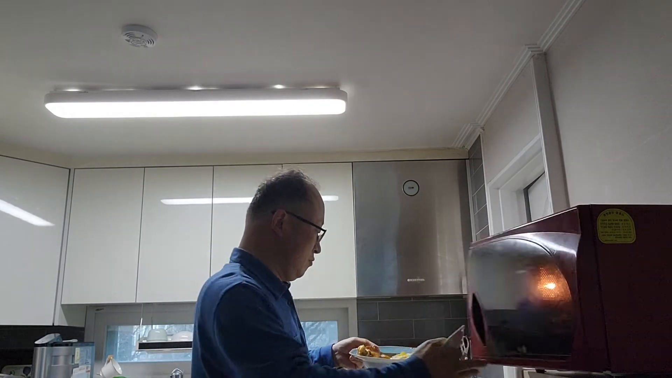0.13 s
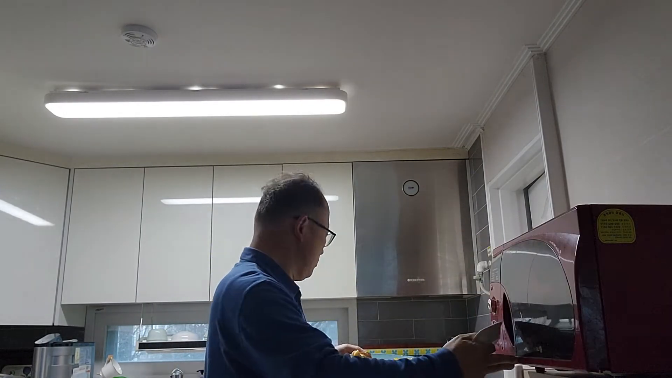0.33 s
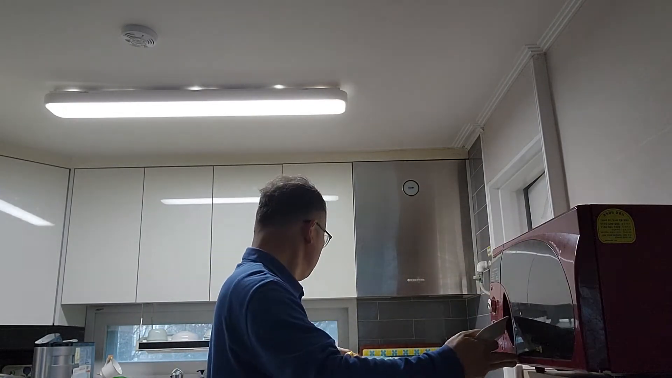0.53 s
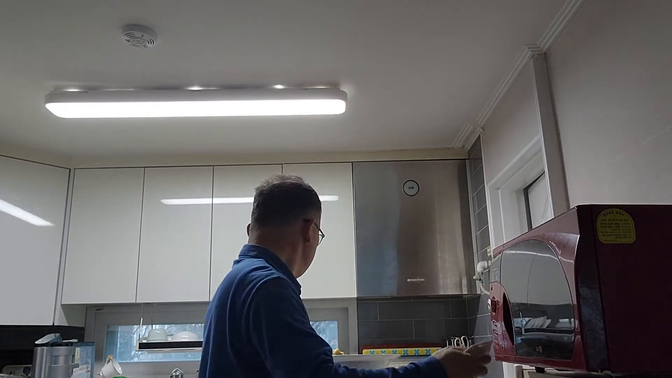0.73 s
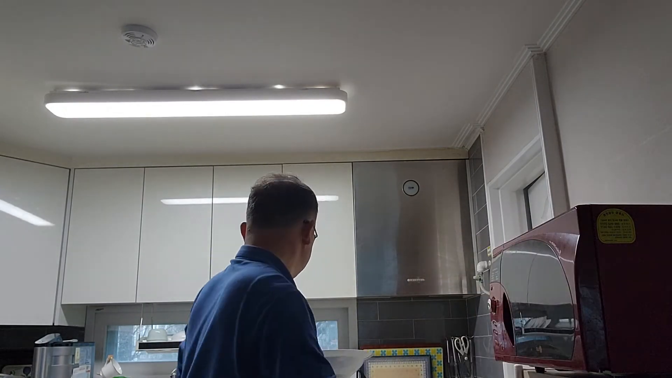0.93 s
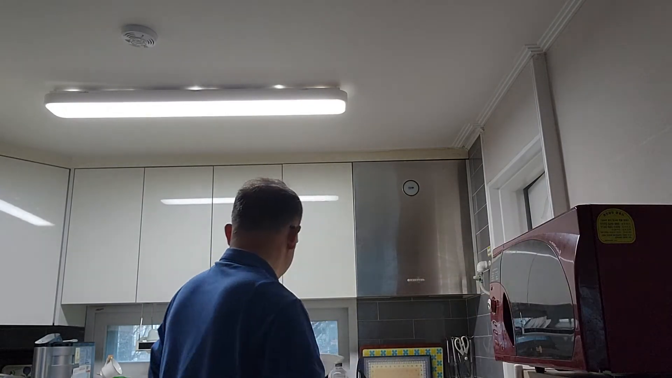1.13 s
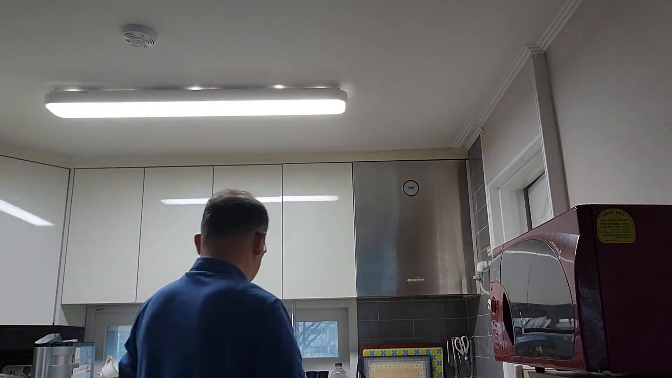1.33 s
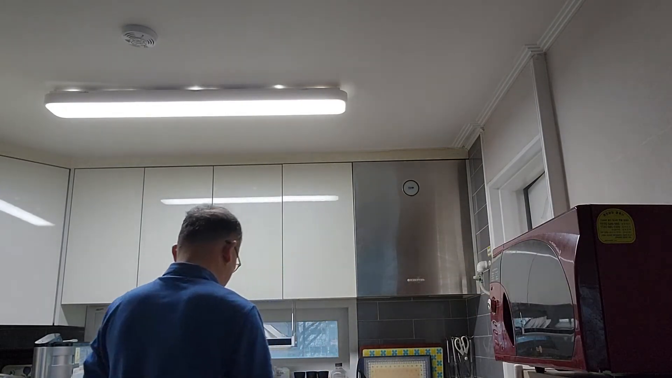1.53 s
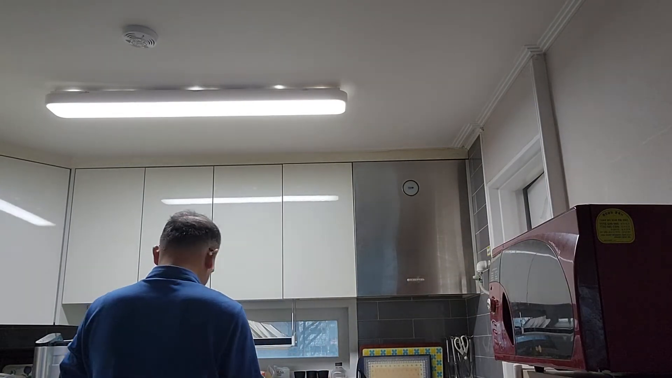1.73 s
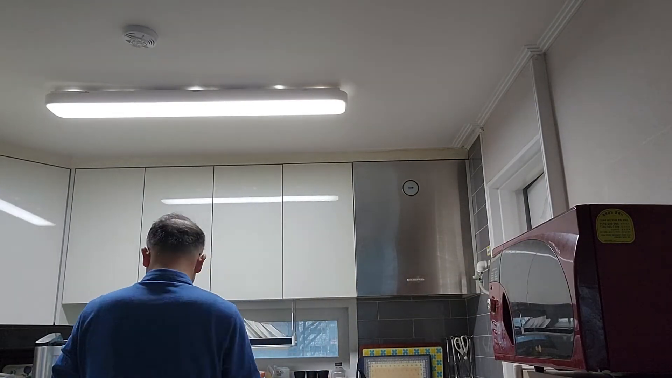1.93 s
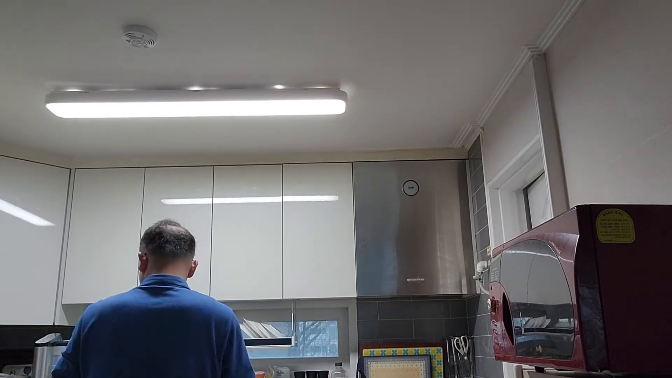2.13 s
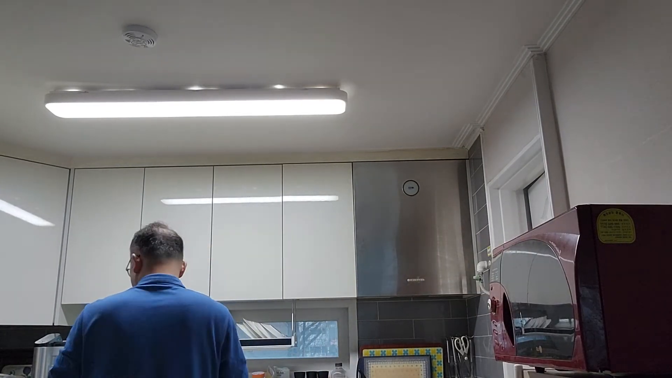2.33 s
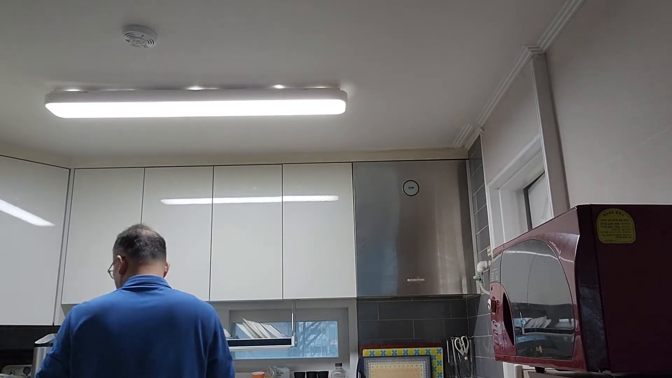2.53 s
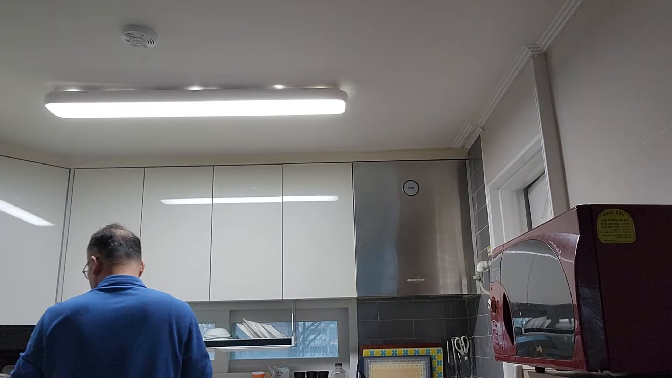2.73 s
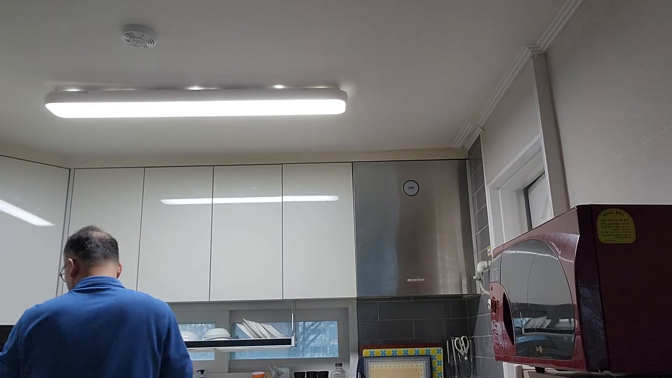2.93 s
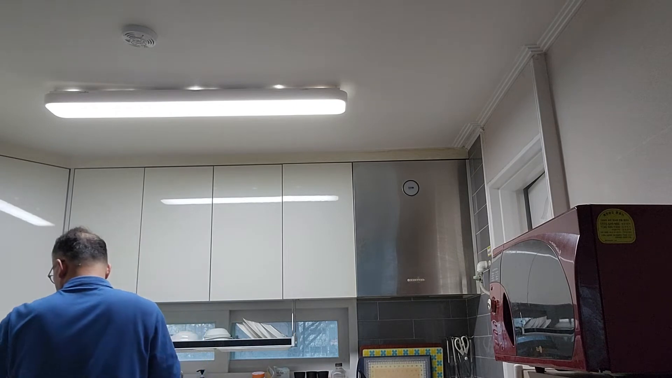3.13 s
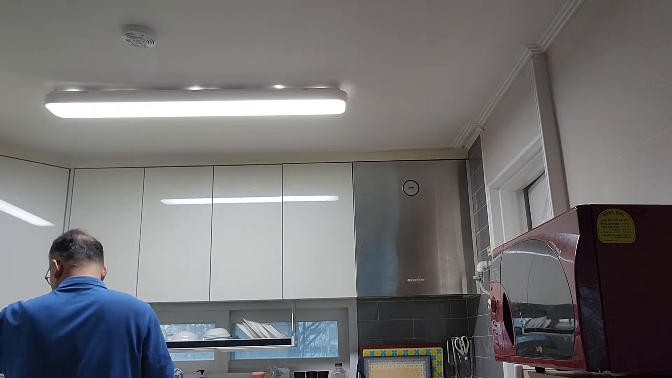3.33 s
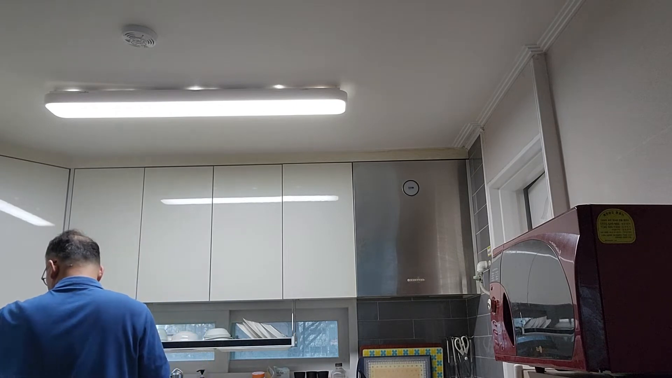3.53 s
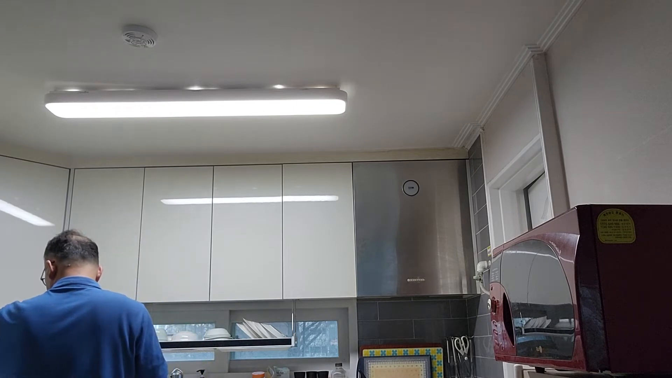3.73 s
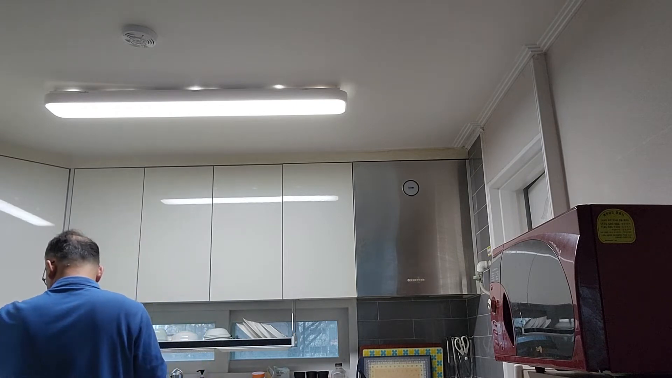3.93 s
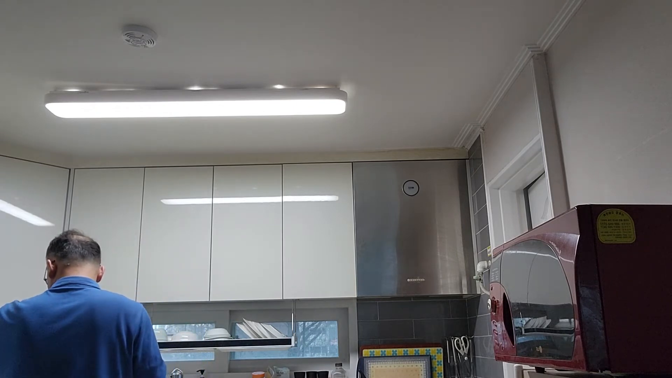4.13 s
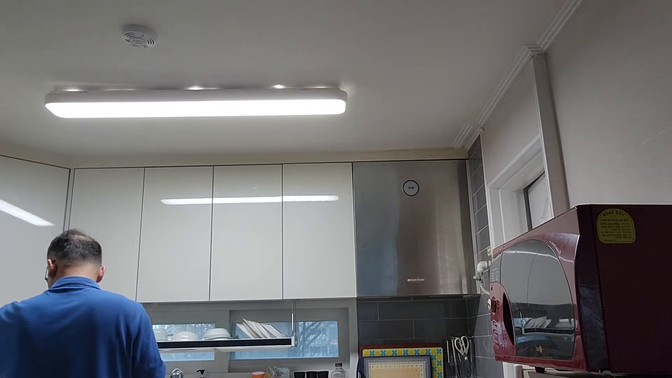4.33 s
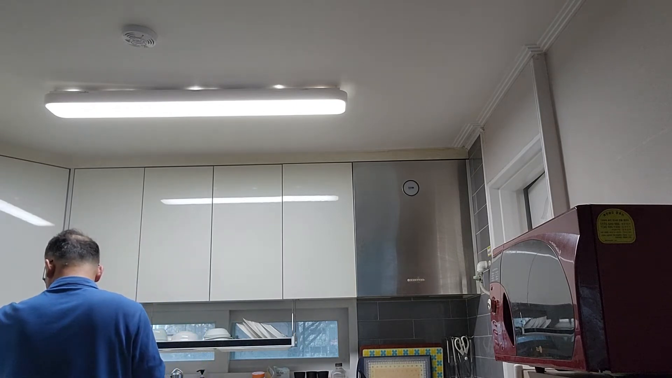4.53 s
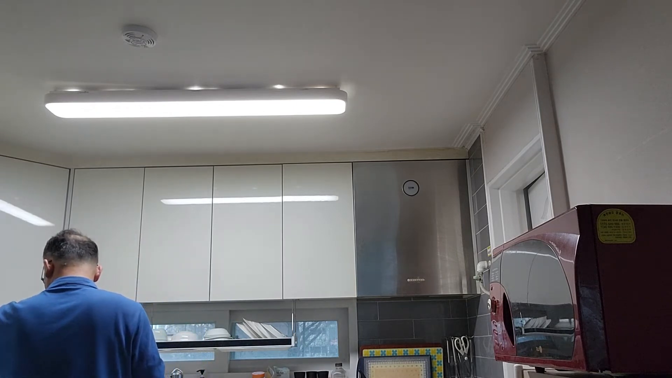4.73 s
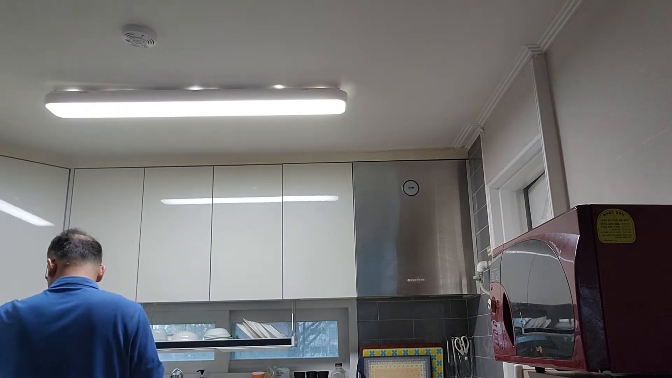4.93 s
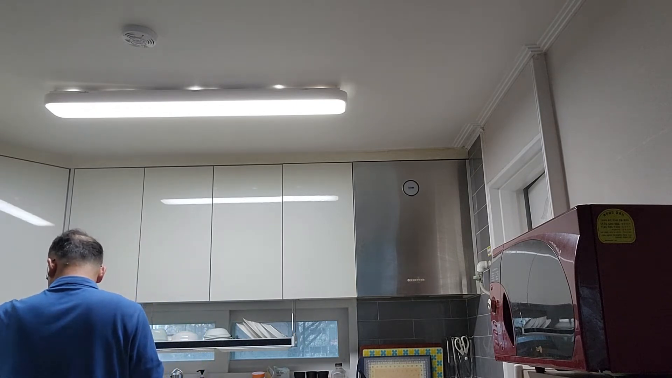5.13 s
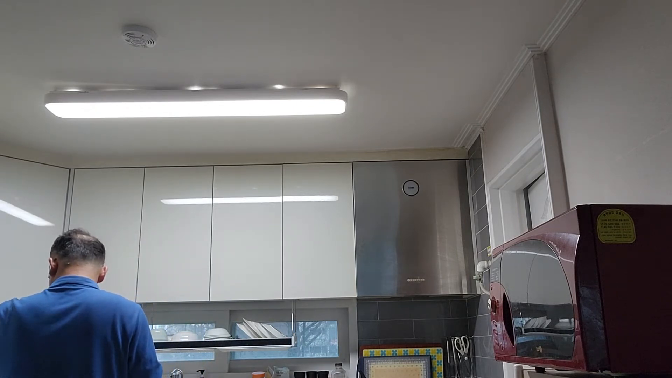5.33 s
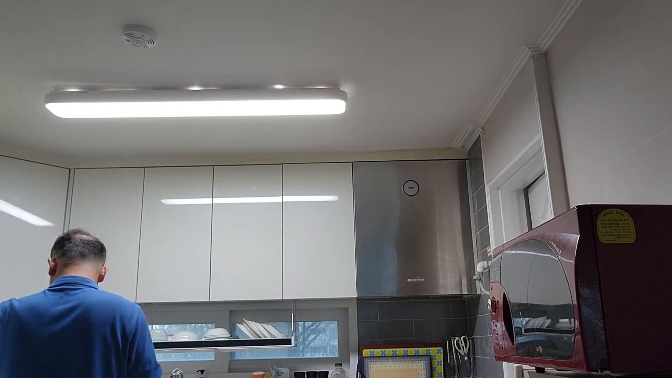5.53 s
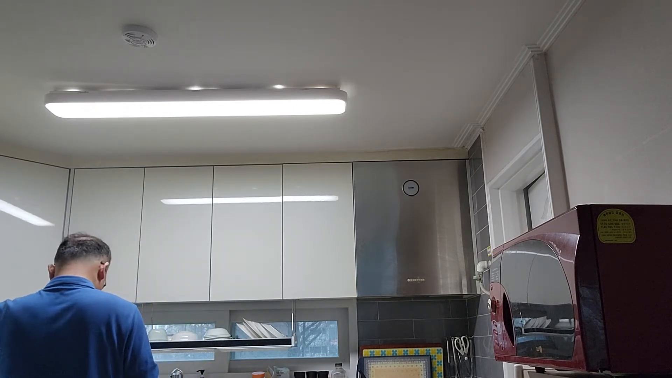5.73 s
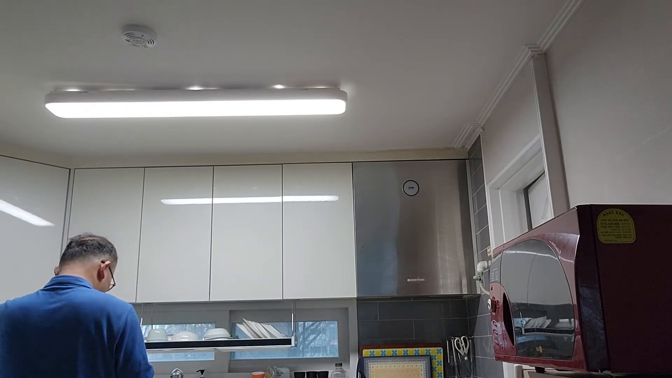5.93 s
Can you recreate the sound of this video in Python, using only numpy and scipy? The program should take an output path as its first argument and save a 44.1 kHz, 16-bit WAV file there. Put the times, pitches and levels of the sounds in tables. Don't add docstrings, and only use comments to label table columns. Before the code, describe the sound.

In a hard-walled kitchen, an oven door thumps closed, a bowl lands with rattling clinks, a softer clink follows, then crisp plastic wrap crackles.

```python
import sys
import numpy as np
from scipy import signal
from scipy.fft import rfft, irfft, next_fast_len
from scipy.io import wavfile

SR = 44100
rng = np.random.default_rng(int(sys.argv[2]) if len(sys.argv) > 2 else 0)


def persist_wave(psi):
    counts = np.round(np.clip(psi, -1, 1) * 32767).astype(np.int16)
    wavfile.write(sys.argv[1], SR, np.atleast_2d(counts).T)


def decibels_to_gain(level_db):
    exponent = np.asarray(level_db, float) / 20
    return 10 ** exponent


N = 268172

# freq_hz, level_db
HUM_SPECTRUM = [(12, -29.5), (20, 12.5), (70, -1.5), (172, -14), (310, -15), (459, -19.5), (527, -23.5),
                (624, -21), (1660, -35), (2750, -40), (3530, -42), (7310, -47), (8890, -56), (14700, -54),
                (16000, -58)]
# freq_hz, likeness (0 to 1)
LIKENESS = [(30, 1), (70, 0.952), (150, 0.87), (300, 0.77), (600, 0.037), (1500, 0.011), (16000, 0.016)]
# freq_hz, t60_s
ROOM_T60 = [(60, 0.93), (250, 0.88), (700, .36), (2000, 0.33), (6000, 0.25), (15000, 0.11)]
# start_s, level_db, length_s
LEANS = [
    (4.031, -52.5, 0.157),
    (4.246, -52, 0.057),
    (4.409, -48.5, 0.035),
    (4.783, -47.5, 0.098),
    (4.853, -39, 0.032),
    (5.047, -44, 0.023),
    (5.205, -38.5, 0.098),
    (5.337, -38.5, 0.021),
    (5.518, -45.5, 0.095),
    (5.983, -57, 0.16),
]
# start_s, peak_db, length_s, brightness_db
MOVES = [(0.047, -83, 0.029, -2), (0.345, -48.5, 0.0208, -5.5), (0.596, -67, 0.29, -4),
         (0.688, -71, 0.0414, -9.5), (0.774, -62.5, 0.0272, -2), (0.833, -72.5, 0.019, 0.5),
         (0.981, -73.5, 0.225, -3), (1.024, -68, 0.0303, -2.78), (1.062, -64, 0.032, -0.5),
         (1.138, -71, 0.0286, 2.5), (1.45, -74, 0.0557, 1.5), (1.664, -66.5, 0.0283, 8),
         (1.769, -63, 0.0495, -5), (1.975, -60.5, 0.0279, 9.5), (2.055, -74, 0.027, -5),
         (2.161, -64.5, 0.0268, 1), (2.237, -47, 0.0097, -6.5), (2.359, -63.5, 0.0436, 0.5)]
# start_s, peak_db, pitch_hz, t60_s
KNOCKS = [(0.79, -68.5, 3800, 0.0561), (0.8, -61, 3780, 0.0313), (1.125, -73.5, 3490, 0.054),
          (1.065, -64, 5040, 0.035), (1.8, -67.5, 3800, 0.0558), (2.244, -46, 900, .008),
          (2.246, -53, 2190, .01), (4.169, -43, 3430, 0.0293), (4.18, -49.5, 630, 0.073),
          (4.283, -63.5, 402, 0.048), (4.55, -60, 2230, .06), (4.285, -56, 1700, .05),
          (5.725, -63.5, 3456, 0.04)]
# start_s, peak_db, pitch_hz, length_s
SLIDES = [
    (5.444, -43.5, 724.8, 0.0321),
    (5.448, -50, 482.9, 0.0467),
    (5.656, -58, 1103, 0.0335),
    (5.709, -58.5, 1050, 0.0374),
]
# start_s, peak_db, length_s, dish_grip_db
TUGS = [(3.733, -50.5, 0.0165, -3.5), (3.782, -70, 0.0517, 3.5), (3.91, -56.5, 0.0356, -0.05),
        (3.923, -48.5, 0.0503, -1.45), (4.079, -54.5, 0.0447, 1), (4.153, -37.5, 0.0416, -2.5),
        (4.255, -43, 0.027, -3), (4.471, -51.5, 0.023, -2.5), (4.529, -49.5, 0.029, 3.5),
        (4.628, -61, 0.047, 7.5), (4.765, -45.5, 0.038, -5.5), (4.795, -38.5, 0.03, -7),
        (4.828, -33, 0.0674, -2.5), (4.942, -50.5, 0.056, -3.5), (5.018, -32, 0.032, -6),
        (5.078, -40, 0.07, -3.5), (5.137, -34.5, 0.0481, -4.5), (5.189, -32, .03, -7),
        (5.203, -29.5, 0.035, -6.5), (5.244, -30.5, .025, -5.5), (5.273, -29.5, 0.036, -5),
        (5.325, -33, .06, -5), (5.41, -46.5, 0.1014, 5.5), (5.516, -36.5, 0.0543, -5.5),
        (5.594, -44, 0.0228, 5), (5.635, -54, 0.0244, -1), (5.697, -40.5, 0.02234, -2.5),
        (5.769, -60.5, 0.0417, 3.5), (5.996, -69, 0.021, 7.5)]
# freq_hz, width_hz, level_db
FILM_PEAKS = [(1869, 510, -9), (3004, 220, -9), (3400, 200, -9), (5170, 250, -8), (5650, 350, -8),
              (7428, 600, -8)]
# freq_hz, width_hz, level_db
SIZZLE_PEAKS = [(10480, 600, -3.5), (11390, 500, -2), (13560, 1400, -1.5)]
# freq_hz, width_hz, level_db
DISH_PEAKS = [(279.4, 64, -10.5), (430.1, 30, 2.5), (494.4, 30, 2.5), (675.4, 190, -3.5), (1050, 25, .5)]
# start_s, peak_db, hardness_db_per_octave
SET_DOWN = [(2.561, -35, 3.5), (2.567, -19, 0.5), (2.5695, -7.5, -2.5), (2.576, -13.5, 0),
            (2.583, -11.5, 4), (2.590, -17, 1.5), (2.596, -13, 1.73), (2.601, -14.5, -0.8),
            (2.607, -15, -1), (2.613, -9, 4.5), (2.622, -12, -2.34), (2.631, -16, -1.86),
            (2.641, -19.5, -3.5), (2.651, -18, -3)]
# start_s, peak_db, hardness_db_per_octave
NUDGE = [(3.049, -48, 4), (3.054, -33, 3.5), (3.059, -20.5, 4.5), (3.064, -21.5, 4.5),
         (3.068, -17.5, -1.95), (3.072, -19, -7.0), (3.079, -23.5, -1), (3.087, -26.5, -6),
         (3.093, -23.5, -2.55), (3.102, -25.5, -0.56), (3.110, -28, -1.57), (3.119, -26, -1.54),
         (3.128, -34, 0.6)]
# freq_hz, level_db, t60_s
BOWL = [(828, -20, 0.0654), (958, -20, 0.027), (1086, -18.5, 0.11), (1262, -12.5, 0.0261),
        (1341.5, -9.5, 0.0658), (1506, -19, 0.2083), (1839, -18, 0.0816), (1962.2, 2.5, .09),
        (2088, -10, 0.0023), (2170, -14, 0.0444), (2308, -19, 0.0674), (2420.5, -17, 0.059),
        (2580, -14, 0.049), (3429.7, -3.5, 0.0567), (3510, -7.5, .08), (3608, -11, .04)]
# freq_hz, width_hz, level_db
BOWL_TOP = [(4590, 87, -4), (4870, 31, 0), (5100, 60, -2), (5520, 70, -1), (6210, 89, -7), (6630, 44, -8),
            (7250, 40, -13), (8320, 280, -6), (9110, 29, -15), (9450, 61, -3), (10400, 52, -13),
            (11500, 100, -10), (12000, 31, -16), (12400, 28, -24), (13100, 68, -11), (14200, 62, -15),
            (15400, 100, -15)]
# freq_hz, level_db, t60_s
PLATE = [(485, -20, 0.036), (591, -20, 0.046), (752, -12, 0.083), (1175.3, 1.5, .08), (1332, -12.5, 0.057),
         (1639, -15.5, 0.056), (1952.5, -1.5, 0.0445), (2018, -8, 0.046), (2066, -1, .05),
         (2132, -8.5, .05), (2300, -14.5, .05), (2672.7, -4, .12), (2845, -8, 0.056), (3392, -14, .04),
         (3494, -13, .035), (3695, -14, 0.044)]
# freq_hz, width_hz, level_db
PLATE_TOP = [(4130, 59, -5), (4470, 34, -3), (5170, 35, 0), (5580, 46, -5), (6220, 40, -7), (6620, 38, -5),
             (7560, 36, -18), (8150, 33, -14), (9390, 33, -18), (10200, 37, -17), (10900, 35, -24),
             (11500, 44, -19), (12100, 120, -20), (12800, 34, -26), (13500, 42, -23), (14100, 150, -30),
             (14900, 35, -32)]
# freq_hz, level_db_per_hz
GRIT = [(180, -66), (300, -38), (1150, -5.5), (1750, -16.5), (1964, -2.5), (2980, -22), (3520, -3),
        (4020, -24), (6500, -27), (8000, -40), (16000, -52)]
# freq_hz, level_db, t60_s
BOOM = [(99.5, -2.5, .1), (197.4, -14.5, 0.055), (72, -12.5, .16), (147.4, -22, .45), (113.5, -16, .27),
        (159.7, -23, 1.1), (210.8, -25, .25), (280.63, -24, .4), (99.5, -27.5, .69), (229.7, -29, .4),
        (305, -28.5, 0.35), (261, -27, 0.3), (375.4, -20.5, 0.27)]
# freq_hz, level_db, t60_s
REBOUND = [(143, -12.5, 0.28), (216.4, -30, .25), (149.86, -19, .75), (279.4, -27, .35), (112, -21, .3)]
# start_s, peak_db, crack_t60_s
DOOR = [(0.3646, -11, 0.0084), (.370, -21, 0.0089), (.375, -17.5, 0.033), (.388, -24.5, 0.12),
        (0.401, -21.5, 0.019), (.408, -5, 0.014), (.412, -11, 0.013), (0.418, -11.5, 0.016),
        (.427, -15.5, 0.016), (.436, -20, 0.036), (.452, -24, 0.11)]
# freq_hz, level_db, t60_s
CASE = [(405, -20.5, 0.3), (409, -4, 0.083), (517, -23, 0.2), (608, -24, 0.16), (668, -13, 0.2),
        (721, -15, 0.25), (1034, -24, 0.19), (549, -22, .15)]
# freq_hz, level_db, t60_s
LATCH = [(668, -1, .04), (735, -2.5, 0.04), (145, -11, 0.05), (404, -16, 0.025), (1457, -17, 0.034),
         (2117, -7.5, 0.019), (3500, -20, 0.025), (8070, -21, 0.013)]
# freq_hz, level_db_per_hz
CRACK = [(190, -31.5), (330, -10), (700, -5), (900, -13), (1450, -11), (2140, -17), (3800, -20),
         (6000, -26.5), (8200, -29), (16000, -32.5)]


def rms_one(x):
    return x / np.sqrt(np.mean(x ** 2) + 1e-20)


def at_hz(points, hz):
    table_hz, value = np.array(points).T
    return np.interp(np.log(hz), np.log(table_hz), value)


def filtered(x, order, edge_hz, kind="low"):
    return signal.sosfilt(signal.butter(order, edge_hz, kind, fs=SR, output="sos"), x)


def pair(n):
    hz = np.maximum(np.arange(n // 2 + 1) * SR / n, 1)
    mid, side = rfft(rng.standard_normal((2, n)))
    alike = np.clip(at_hz(LIKENESS, hz), 0, 1)
    return np.sqrt(1 + alike) * mid + np.sqrt(1 - alike) * side * [[1], [-1]], hz


def coloured(spectrum):
    n = next_fast_len(N)
    both, hz = pair(n)
    return rms_one(irfft(both * decibels_to_gain(at_hz(spectrum, hz)), n)[:, :N])


def ring(clicks, hz, t60_s):
    r = decibels_to_gain(-60 / (t60_s * SR))
    w = 2 * np.pi * hz / SR
    return signal.lfilter([0, np.sin(w)], [1, -2 * r * np.cos(w), r * r], clicks + 1e-18)


def strike(start_s, level_db, modes, spread_db, hard_db=0., pivot_hz=2000):
    at = np.round(np.array(start_s) * SR).astype(int)
    first, out = at.min(), np.zeros(N)
    luck = rng.standard_normal((len(at), len(modes)))
    for k, (hz, db, t60_s) in enumerate(modes):
        clicks = np.zeros(int(1.5 * SR))
        tilt_db = hard_db * np.log2(hz / pivot_hz)
        clicks[at - first] = decibels_to_gain(level_db + db + spread_db * luck[:, k] + tilt_db)
        out[first:first + len(clicks)] += ring(clicks, hz, t60_s) * (-1) ** k
    return out


def burst(start_s, level_db, rise_s, hold_s, t60_s):
    out = np.zeros(N)
    for s, db, rise, hold, t60 in np.broadcast(start_s, level_db, rise_s, hold_s, t60_s):
        i = int(s * SR)
        t = np.arange(min(N - i, SR // 2)) / SR
        fall_db = 60 * np.maximum(t - hold, 0) / t60
        out[i:][:len(t)] += decibels_to_gain(db - fall_db) * (1 - np.exp(-t / rise)) ** 2
    return out


def wander(step):
    knots = N // step + 2
    return np.interp(np.arange(N) / step, np.arange(knots), rng.standard_normal(knots))


def crackle(peaks, low_hz, high_hz, per_s, uneven_db, broad, shift_db=3.5):
    snaps = (rng.random(N) < per_s / SR) * rng.choice([-1, 1], N)
    snaps = snaps * decibels_to_gain(uneven_db * np.minimum(rng.exponential(1, N), 4))
    snaps = snaps * decibels_to_gain(2 * wander(300))
    out = broad * snaps
    for hz, width_hz, db in peaks:
        r = np.exp(-np.pi * width_hz / SR)
        poles = [1, -2 * r * np.cos(2 * np.pi * hz / SR), r * r]
        peak = signal.lfilter([(1 - r * r) / 2, 0, (r * r - 1) / 2], poles, snaps)
        out = out + decibels_to_gain(db + shift_db * wander(1500)) * peak
    return rms_one(filtered(out, 2, [low_hz, min(high_hz, .45 * SR)], "band"))


def place(x, pan_db, lag):
    i = np.arange(N)
    left = np.interp(i - lag / 2, i, x) * decibels_to_gain(pan_db / 2)
    right = np.interp(i + lag / 2, i, x) * decibels_to_gain(-pan_db / 2)
    return np.array([left, right])


def room_hum():
    return decibels_to_gain(-53.5) * coloured(HUM_SPECTRUM)


def kitchen(x):
    n = 1 << 15
    both, hz = pair(n)
    t, tail = np.arange(n) / SR, 0
    cupboards = decibels_to_gain(10.0 - 60 * t / 0.081)
    next_room = decibels_to_gain(-19.5 - 60 * t / 0.64)
    for centre_hz in 40 * 2 ** np.arange(0, 9, .5):
        band = np.maximum(1 - 2 * np.abs(np.log2(hz / centre_hz)), 0)
        decay = decibels_to_gain(-60 * t / at_hz(ROOM_T60, centre_hz))
        tail = tail + irfft(both * band, n) * (decay + cupboards + next_room)
    tail = tail * (1 - np.exp(-(t / .002) ** 2))
    return signal.fftconvolve(x[None], tail / np.sqrt(np.sum(tail ** 2)), axes=1)[:, :N]


def counter_shake():
    s, db, length_s = np.transpose(LEANS)
    lumps = coloured([(15, -29), (32, 1.0), (50, 10.5), (75, 1.5), (110, -6.5), (170, -20.5), (400, -58.5)])
    return burst(s, db, 0.013, length_s, .25) * lumps


def moves():
    s, peak_db, length_s, bright_db = np.transpose(MOVES)
    rise_s, t60_s, uneven_db = length_s / 5, .1, 2.5
    brush = crackle([(3800, 59, 0.1)], 1800, 7700, 22000, uneven_db, broad=1.0)
    hiss = crackle(SIZZLE_PEAKS, 8800, 17000, 12000, uneven_db, broad=0.79)
    scuff = crackle([(953, 67, 0.11)], 490, 2378, 3700, uneven_db, broad=1.0)
    out = burst(s, peak_db - 17.5, rise_s, length_s, t60_s) * brush
    out += burst(s, peak_db + bright_db - 24.5, rise_s, length_s, t60_s) * hiss
    return out + burst(s, peak_db - bright_db - 15, rise_s, length_s, t60_s) * scuff


def knocks():
    out = np.zeros(N)
    for s, db, hz, t60_s in KNOCKS:
        touch = np.zeros(N)
        touch[round(s * SR):][:4] = decibels_to_gain(db) / 4
        out += ring(touch, hz, t60_s)
    return out


def slides():
    out = np.zeros(N)
    for s, db, hz, length_s in SLIDES:
        t = np.arange(int(length_s * SR)) / SR
        swell = np.sin(np.pi * t / length_s) ** 2
        out[int(s * SR):][:len(t)] += decibels_to_gain(db) * swell * np.sin(2 * np.pi * hz * t)
    return out


def film():
    s, peak_db, length_s, grip_db = np.transpose(TUGS)
    rise_s = 0.00976
    sizzle_db = 0.36 * (peak_db + 38) - 0.23 * grip_db - 8
    creases = crackle(FILM_PEAKS, 1430, 9000, 4000, uneven_db=3.0, broad=0.78, shift_db=5.5)
    sizzle = crackle(SIZZLE_PEAKS, 8000, 19000, 7000, uneven_db=2.5, broad=0.3, shift_db=2.5)
    rub = crackle(DISH_PEAKS, 218.5, 1070, 3000, uneven_db=2.0, broad=0.423, shift_db=4.0)
    out = burst(s, peak_db - 16.0, rise_s, length_s, 0.1467) * creases
    out += burst(s, peak_db + sizzle_db - 8.5, rise_s, length_s, 0.091) * sizzle
    return out + burst(s, peak_db + grip_db - 15, rise_s, length_s, 0.1476) * rub


def crockery(contacts, main, top, level_db, top_db, top_t60_s, grit_db, tilt_db, dulling_db):
    s, peak_db, hard_db = np.transpose(contacts)
    grit = burst(s, peak_db + grit_db, .0008, 0.0081, 0.019) * coloured(GRIT)[0]
    pairs = [(hz + side * width_hz / 3, db + top_db, top_t60_s)
             for hz, width_hz, db in top for side in (-1, 1)]
    body = filtered(strike(s, peak_db + level_db, main, 2.7, hard_db), 2, 5200)
    shine_hard_db = tilt_db - dulling_db * (s - s[0])
    shine = strike(s, peak_db + level_db, pairs, 3.0, shine_hard_db, pivot_hz=4000)
    return filtered(body + shine + grit, 2, 450, "high")


def door_boom():
    slam = strike([.4093], -1.5, BOOM, spread_db=0)
    rebound = strike([.4538], .1, REBOUND, spread_db=0.5)
    return filtered(rebound - slam, 1, 500)


def door():
    s, peak_db, t60_s = np.transpose(DOOR)
    heavy = s > .39
    case = strike(s[heavy], peak_db[heavy] - 17.0, CASE, spread_db=2.5)
    latch = strike(s, peak_db - 6, LATCH, spread_db=4.5)
    crack = burst(s, peak_db - 7.5, 0.0013, 0.0042, t60_s) * coloured(CRACK)[0]
    return case + latch + crack


def scene():
    oven, low = door(), door_boom()
    dishes = crockery(SET_DOWN, BOWL, BOWL_TOP, level_db=-15.0, top_db=-15, top_t60_s=0.035,
                      grit_db=-25, tilt_db=8.0, dulling_db=70.0)
    dishes += crockery(NUDGE, PLATE, PLATE_TOP, level_db=-14.5, top_db=-2, top_t60_s=0.03,
                       grit_db=-19, tilt_db=4.5, dulling_db=70.0)
    cook = film() + moves() + knocks() + slides()
    other_hand = film()
    direct = place(oven, -.2, 6.5) + place(low, -.2, 18.0) + place(dishes, 3.5, -2.5)
    direct += place(cook, 8.4, -10.0) + place(other_hand, -3.2, -7.5)
    wet = kitchen(oven + decibels_to_gain(-13.5) * low + decibels_to_gain(-1.5) * dishes + decibels_to_gain(4.5) * cook)
    return direct + wet + counter_shake() + room_hum()


def roll_off(x):
    return signal.sosfilt(signal.butter(12, 15870, fs=SR, output="sos"), x)


def record(dry):
    heard = filtered(dry, 3, 58, "high")
    rounded = 1.525 * np.tanh(heard / 1.44)
    top_edge = signal.ellip(8, .3, 50, 15920, fs=SR, output="sos")
    return roll_off(signal.sosfilt(top_edge, rounded))


dry = scene()
out = record(dry)
persist_wave(out)
```